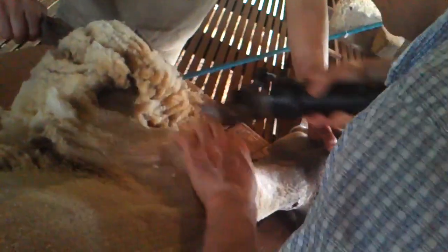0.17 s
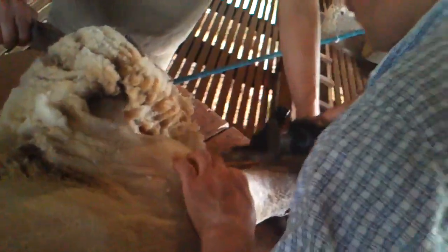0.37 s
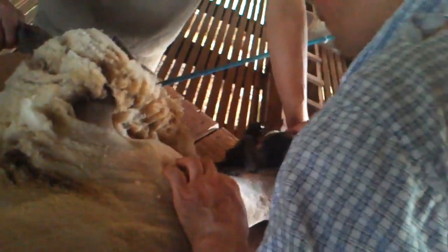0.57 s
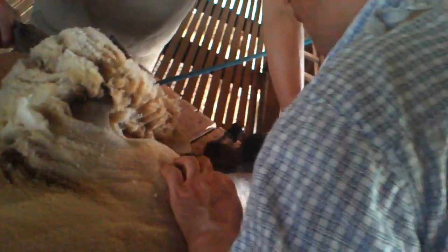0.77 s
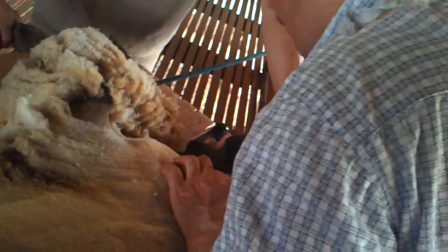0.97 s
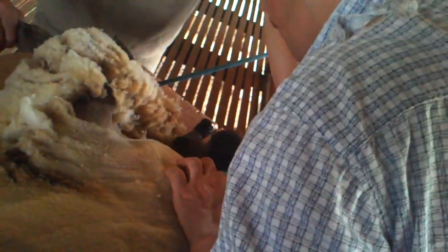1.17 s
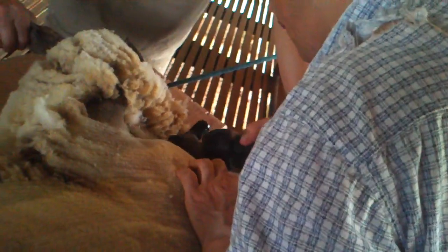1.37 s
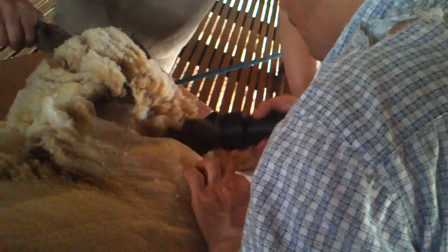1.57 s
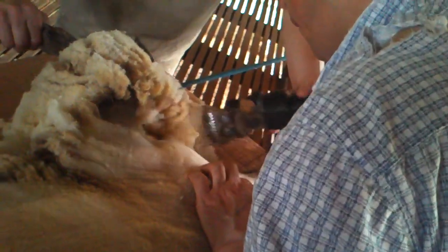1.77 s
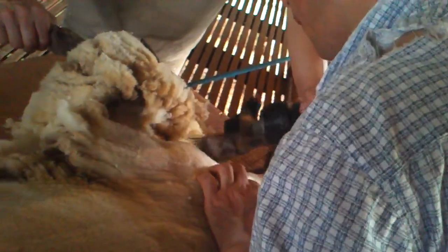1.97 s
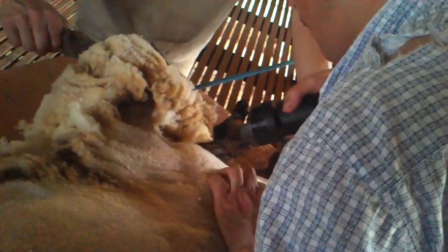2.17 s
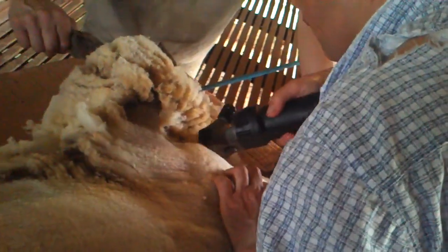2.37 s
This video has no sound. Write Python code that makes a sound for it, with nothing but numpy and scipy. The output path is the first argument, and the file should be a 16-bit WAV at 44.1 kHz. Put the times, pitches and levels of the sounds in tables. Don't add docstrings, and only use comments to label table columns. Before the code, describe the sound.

A loud handheld sheep clipper whirs without pause, its shrill whine dipping and returning as the hand turns it, over fast scraping, clattering steel and hissing air, close and slightly distorted inside a wooden shed.

```python
import sys
import numpy as np
from scipy import signal
from scipy.fft import rfft, irfft, next_fast_len
from scipy.io import wavfile
from scipy.ndimage import uniform_filter1d, minimum_filter1d, map_coordinates

SR = 44100
rng = np.random.default_rng(int(sys.argv[2]) if len(sys.argv) > 2 else 0)


def transcribe(signal):
    frames = np.atleast_2d(signal).T
    limited = np.clip(frames, -1, 1)
    pcm = np.round(limited * 32767).astype(np.int16)
    wavfile.write(sys.argv[1], SR, pcm)


def makeup_ratio(level_db):
    decades = np.asarray(level_db, float) / 20
    return 10 ** decades


N = 111132

# t/s, f/Hz
MOTOR_SPEED = [(0, 6813), (0.12, 6837), (0.3, 6852), (0.45, 6858), (0.62, 6853), (0.77, 6827), (0.89, 6856),
               (1.0, 6848), (1.1, 6850), (1.22, 6835), (1.3, 6837), (1.4, 6821), (1.58, 6828), (1.75, 6847),
               (1.88, 6871), (2.08, 6861), (2.28, 6879), (2.52, 6877)]
# t/s, whistle level/dB, air rush level/dB
FAN_FACING = [(0.0, -11, 1), (0.36, -11, 2.5), (0.52, -25, 3), (0.6, -19.5, 2), (0.83, -13.5, 0.5),
              (1.03, -17.5, -0.5), (1.24, -14, -1), (1.58, -15.5, 1), (1.63, -10.5, 1), (1.7, -28, 0.5),
              (1.82, -12.5, 1), (2.08, -13, 2.5), (2.2, -9.5, 1), (2.43, -10.5, 2.5), (2.52, -15.5, 1)]
# t/s, pinion level/dB, housing resonance f/Hz, cutter level/dB
CUTTING_HEAD = [(0, -23, 2100, 3), (.15, -21.5, 2000, 0), (.34, -30, 2220, 0), (.44, -21, 2440, 1),
                (.53, -16.5, 2430, 1.5), (.62, -21.5, 2130, 0), (.8, -24, 2120, 0), (.9, -26, 2080, 0.5),
                (1.05, -27, 2050, -0.5), (1.2, -32, 2140, 0), (1.4, -28, 2120, 0), (1.52, -28, 2130, -0.5),
                (1.62, -44, 2100, 0.5), (1.8, -34, 2020, -1), (2, -28, 2170, 0), (2.15, -30.5, 2110, 1.5),
                (2.35, -25.5, 2100, 1), (2.52, -24.5, 2100, 0.5)]
# order [per shaft turn], level/dB
SHAFT_ORDERS = [(10, -40), (12, -44.5), (13, -34), (17, -42)]
# order [per crank turn, two strokes], level/dB
CRANK_ORDERS = [(15, -49), (19, -44), (26, -48)]
MESH_SIDEBANDS = [.12, .2, .6, 1, .7, .5, .35]
# f/Hz, level/dB [per Hz]
SCRAPE_COLOUR = [(35, -40), (70, -31), (260, -25), (780, -9), (1400, -8), (2100, -2), (2700, -4.5),
                 (3500, -2.5)]
# f/Hz, level/dB [per Hz]
AIR_COLOUR = [(7400, 1), (8260, 0.5), (9190, -8), (10300, -10), (12100, -25), (15700, -41)]
# f/Hz, level/dB [per Hz]
EDGE_COLOUR = [(30, -2), (120, 2), (400, 2), (900, -23), (8500, -25), (11000, 3), (12500, -2.5),
               (15700, -5)]
# f/Hz, width [Hz], level/dB
BLADE_MODES = [(830, 227, -11), (1700, 150, -1), (3600, 325, 1.5), (5180, 970, 3), (8100, 730, -8.5)]
# f/Hz, t60 [s]
SHED_DECAY = [(200, 0.32), (2000, 0.75), (10000, 0.13)]
# t/s, length [s], f/Hz, level/dB
WOOL_BITES = [(0.057, 0.11, 1700, -34), (.3, 0.024, 7500, -19), (0.413, 0.046, 7700, -18),
              (0.565, 0.045, 3600, -20), (1.02, 0.017, 4850, -27), (1.31, 0.025, 1742, -24),
              (1.35, 0.011, 3680, -20), (1.393, 0.012, 3590, -20), (1.487, 0.02, 3950, -32),
              (1.543, 0.08, 1700, -24), (1.69, .015, 4350, -19), (2.324, 0.017, 4000, -21),
              (2.476, 0.11, 1624, -26), (2.47, .04, 3700, -27)]

FAN_BLADES, PINION_TEETH, TURNS_PER_STROKE = 16, 5, 5.25
STROKE_START = 0.03


def unit(x):
    return x / np.sqrt(np.mean(x ** 2) + 1e-20)


def along(points, hz):
    f, v = np.transpose(points)
    return np.interp(np.log(hz + 1), np.log(f + 1), v)


def curves(rows):
    s, *cols = np.transpose(rows)
    return [np.interp(np.arange(N) / SR, s, c) for c in cols]


def wobble(rate):
    knots = rng.standard_normal(int(N * 200 / SR) + 4)
    return map_coordinates(knots, [np.arange(N) * min(rate, 200) / SR])


def sine(cycles, unrest=0):
    return np.sin(2 * np.pi * cycles + unrest)


def filtered(x, response):
    m = next_fast_len(N + SR // 2)
    return irfft(rfft(x, m) * response(np.fft.rfftfreq(m, 1 / SR)), m)[..., :N]


def coloured(x, colour):
    return unit(filtered(x, lambda hz: makeup_ratio(along(colour, hz))))


def patchy(patchy_db):
    z = signal.stft(rng.standard_normal(N), nperseg=512)[2]
    field = uniform_filter1d(rng.standard_normal(z.shape), size=7, axis=0)
    field = uniform_filter1d(field, size=12, axis=1)
    return signal.istft(z * makeup_ratio(patchy_db * unit(field)), nperseg=512)[1][:N]


def swell(strokes, depth_db, lag):
    return makeup_ratio(depth_db * np.cos(2 * np.pi * (strokes - lag)))


def shed(x):
    hz, t, z = signal.stft(rng.standard_normal(SR // 2), SR, nperseg=256)
    decay = makeup_ratio(-60 * t / along(SHED_DECAY, hz)[:, None])
    tail = signal.istft(z * decay, SR, nperseg=256)[1]
    return signal.fftconvolve(x, tail / np.linalg.norm(tail))[:N]


def edge_hiss():
    level_db, follows = -33, 0.82
    whistle_db, _ = curves(FAN_FACING)
    air = coloured(patchy(patchy_db=1.4), EDGE_COLOUR)
    return makeup_ratio(level_db + follows * (whistle_db - whistle_db.mean())) * air


def motor_hum(turns):
    sway_db, overtone, overtone_db = 2.5, 31, -36
    crank = [(k / TURNS_PER_STROKE / 2, db) for k, db in CRANK_ORDERS]
    hum = 0
    for order, db in list(SHAFT_ORDERS) + crank:
        level = makeup_ratio(db + sway_db * wobble(14))
        hum = hum + level * sine(order * turns, 0.89 * wobble(30.7))
    whistle_db, _ = curves(FAN_FACING)
    level = makeup_ratio(whistle_db + overtone_db + 1.9 * wobble(12.6))
    return np.sqrt(2) * (hum + level * sine(overtone * turns, 1.3 * wobble(60)))


def wool_bites(strokes):
    waver = 1.1
    t = np.arange(N) / SR
    squeals = 0
    for s, length, hz, db in WOOL_BITES:
        bell = np.exp(-2 * ((t - s) / length) ** 2)
        squeals = squeals + makeup_ratio(db) * bell * sine(hz * t, waver * wobble(190))
    return squeals * swell(strokes, depth_db=7.5, lag=0.055)


def pinion(turns, strokes):
    mesh_db, mesh_lag, width_hz = 2, 0.15, 140
    level_db, centre_hz, _ = curves(CUTTING_HEAD)
    speed = np.gradient(turns) * SR
    tone = 0
    for k in range(-3, 4):
        hz = speed * (PINION_TEETH + k / TURNS_PER_STROKE)
        resonance = 1 / np.hypot(1, (hz - centre_hz) / width_hz)
        size = MESH_SIDEBANDS[k + 3] * makeup_ratio(0.5 * wobble(10.9)) * resonance
        tone = tone + size * sine(PINION_TEETH * turns + k * (strokes - mesh_lag))
    return makeup_ratio(level_db + mesh_db) * tone


def blade_ring(f):
    top_hz = 7400
    ring = 0
    for k, (centre, width, db) in enumerate(BLADE_MODES):
        mode = 1j * f * width / (centre * centre - f * f + 1j * f * width)
        ring = ring + (-1) ** k * makeup_ratio(db) * mode
    return ring / (1 + 1j * f / top_hz) ** 4


def clatter(strokes):
    ends = np.flatnonzero(np.diff(np.floor(strokes)))
    draw = rng.standard_normal((300, 4, 2))[:len(ends)]
    at = ends[:, None] + 0.0013 * SR * draw[..., 0]
    at = np.clip(at, 0, N - 1).astype(int)
    force = makeup_ratio(2.8 * draw[..., 1]) * np.sign(draw[:, ::-1, 0])
    knocks = np.bincount(at.ravel(), force.ravel(), N)
    return unit(filtered(knocks, blade_ring))


def cutter(strokes):
    scrape_db, clatter_db = -17.5, -24.5
    *_, level_db = curves(CUTTING_HEAD)
    colour = list(SCRAPE_COLOUR) + [(6000, -5.5), (8000, -18), (12000, -32)]
    scrape = coloured(patchy(patchy_db=1.5) * swell(strokes, depth_db=2.0, lag=0.011), colour)
    return makeup_ratio(level_db) * (makeup_ratio(scrape_db) * scrape + makeup_ratio(clatter_db) * clatter(strokes))


def fan(turns, strokes):
    whistle_gain_db, rush_gain_db = 3.5, -15.5
    whistle_db, rush_db = curves(FAN_FACING)
    level = makeup_ratio(whistle_db + whistle_gain_db + 0.6 * wobble(26.25))
    whistle = level * sine(FAN_BLADES * turns, 0.24 * wobble(55))
    colour = [(3000, -28.5), (5600, -9.5), (6600, 2.0)] + list(AIR_COLOUR)
    rush = coloured(patchy(patchy_db=1.5) * swell(strokes, depth_db=2.2, lag=-0.021), colour)
    return np.sqrt(2) * whistle + makeup_ratio(rush_gain_db + rush_db) * rush


def scene():
    whistle_hz, = curves(MOTOR_SPEED)
    turns = np.cumsum(uniform_filter1d(whistle_hz, size=1500)) / FAN_BLADES / SR
    strokes = turns / TURNS_PER_STROKE + STROKE_START
    blades = wool_bites(strokes) + cutter(strokes)
    motor = edge_hiss() + motor_hum(turns) + pinion(turns, strokes) + fan(turns, strokes)
    return (motor + blades + makeup_ratio(-13.5) * shed(blades))[None]


def band_limit(x):
    return signal.sosfilt(signal.butter(12, 16330, fs=SR, output="sos"), x)


def record(dry):
    gain_db, ceiling, hardness, top_hz = 1.42, 0.745, 15, 15720
    x = makeup_ratio(gain_db) * dry
    need = (1 + np.abs(x / ceiling) ** hardness) ** (-1 / hardness)
    held = x * uniform_filter1d(minimum_filter1d(need, size=3), size=3)
    mix = filtered(held, lambda hz: hz < top_hz)
    return band_limit(mix)


dry = scene()
out = record(dry)
transcribe(out)
```